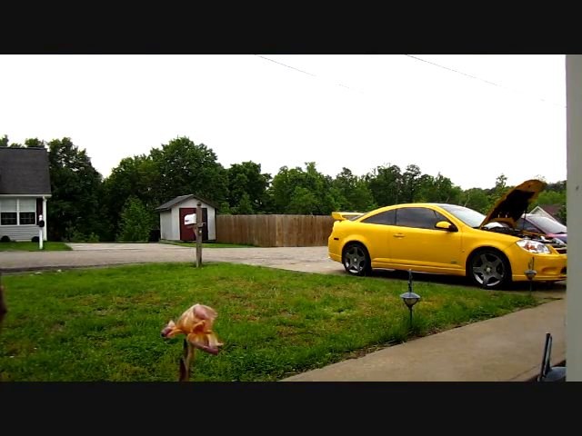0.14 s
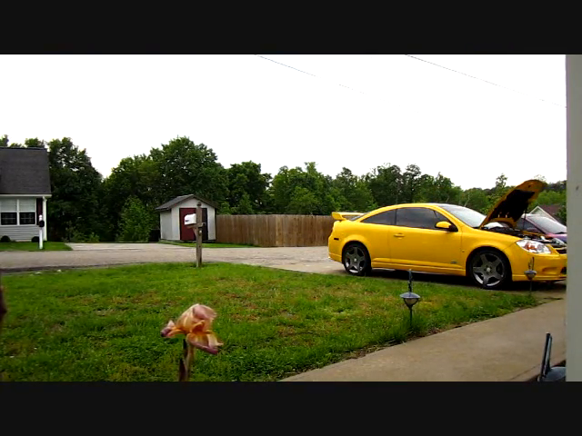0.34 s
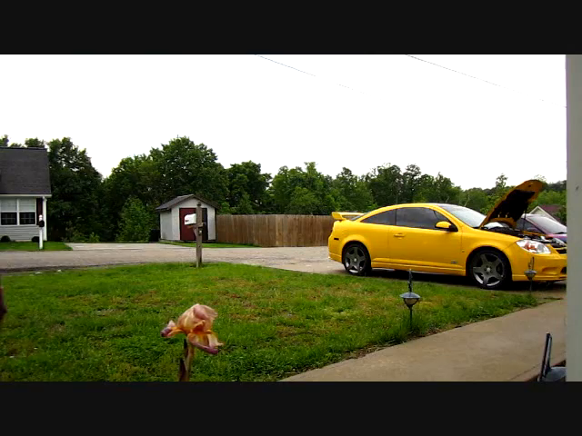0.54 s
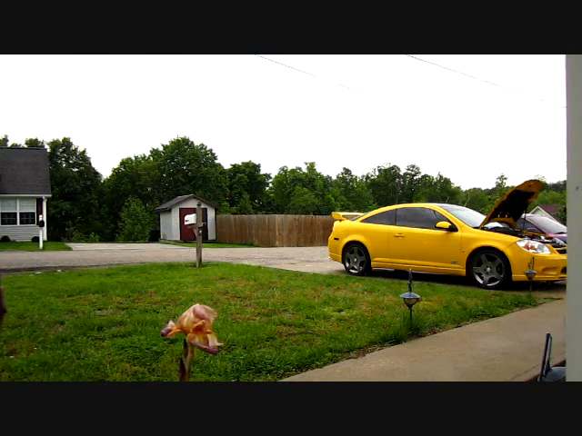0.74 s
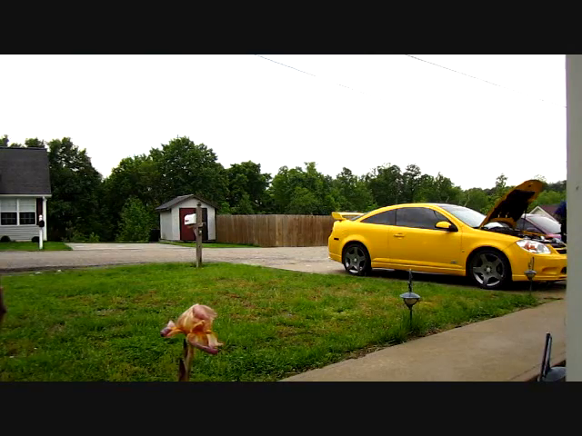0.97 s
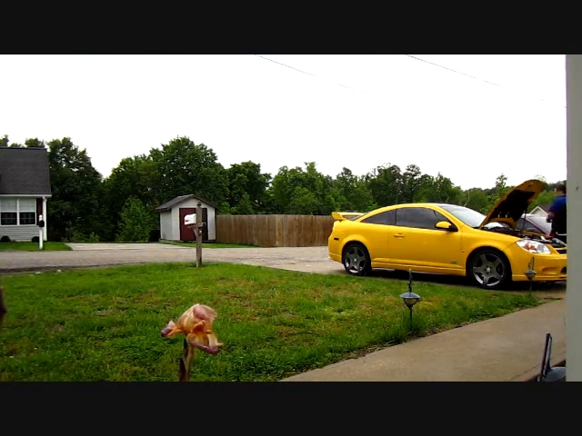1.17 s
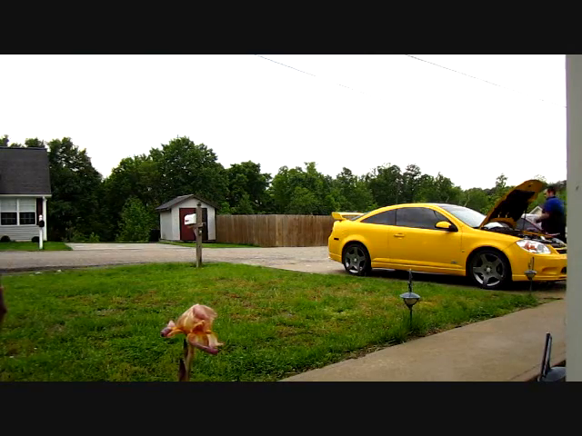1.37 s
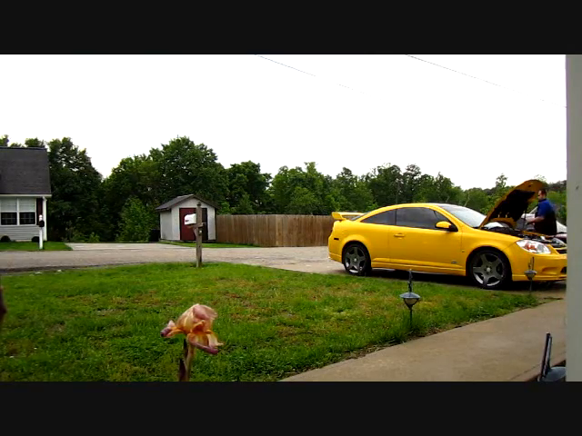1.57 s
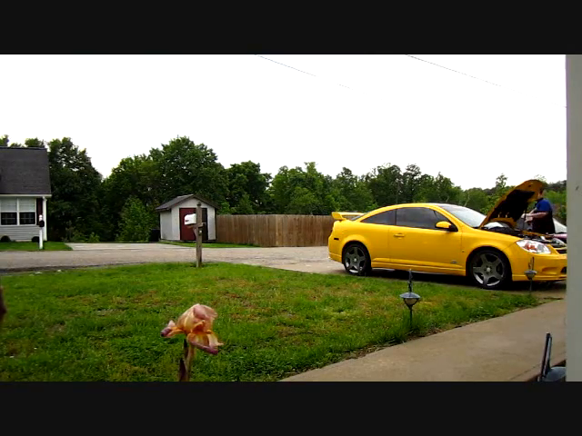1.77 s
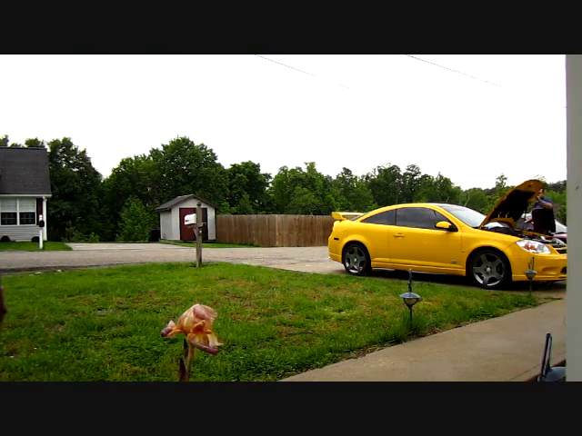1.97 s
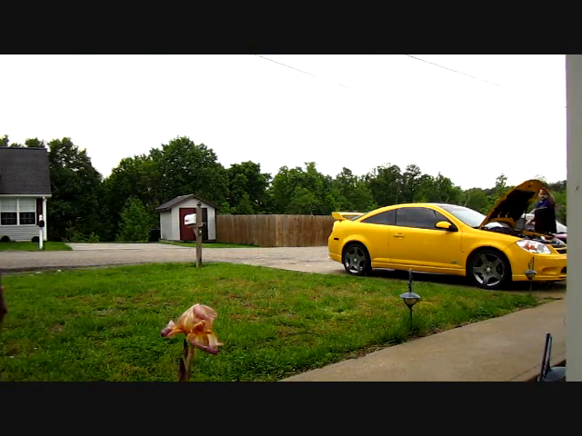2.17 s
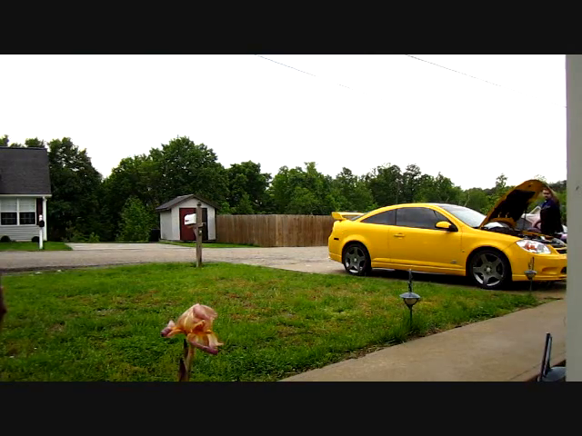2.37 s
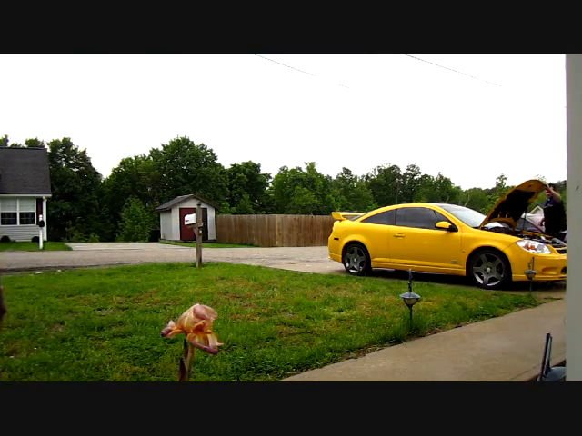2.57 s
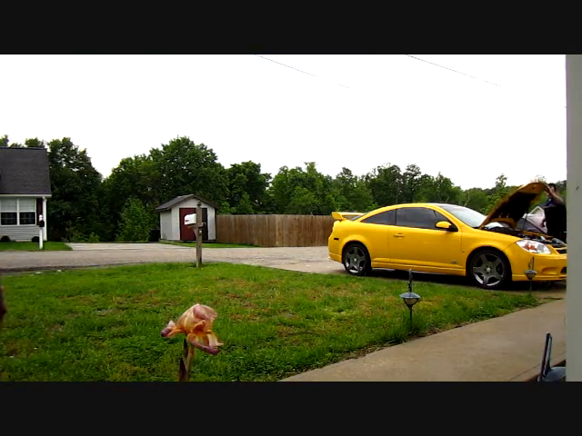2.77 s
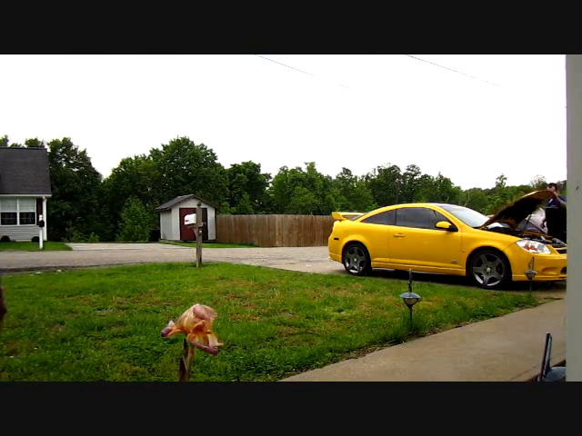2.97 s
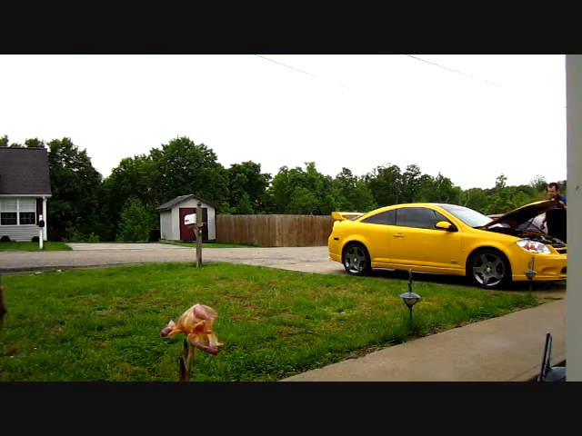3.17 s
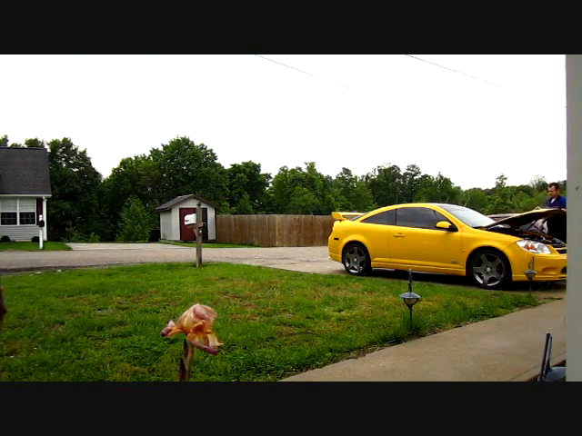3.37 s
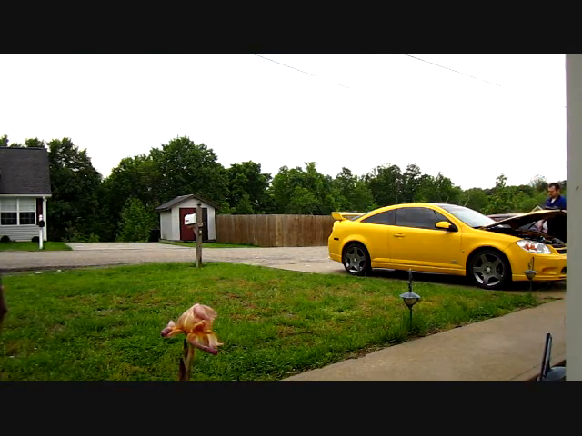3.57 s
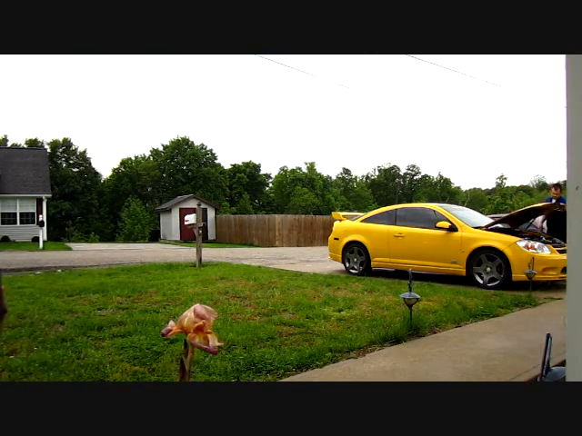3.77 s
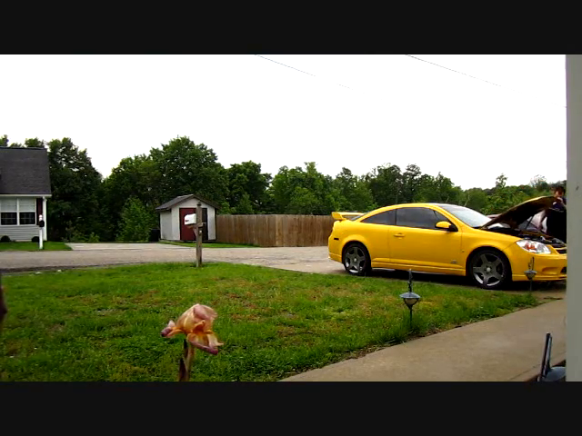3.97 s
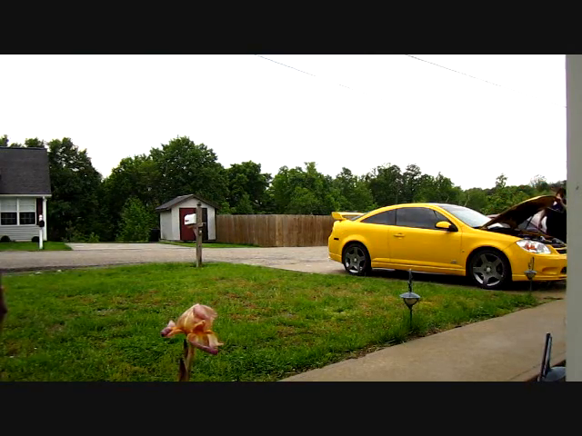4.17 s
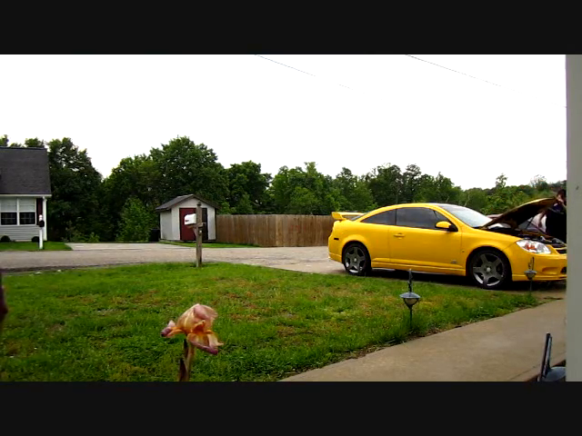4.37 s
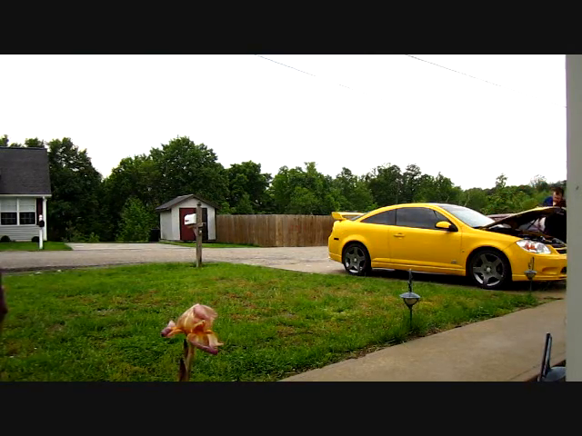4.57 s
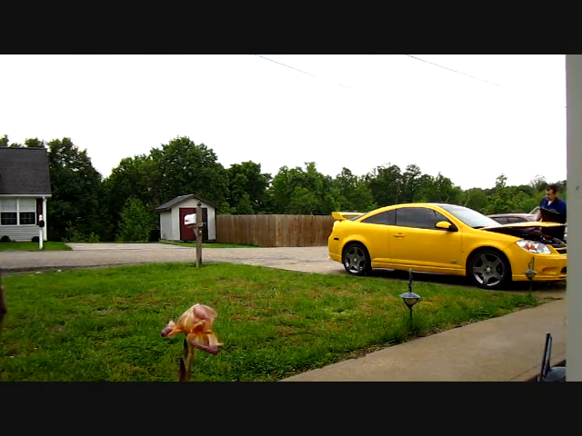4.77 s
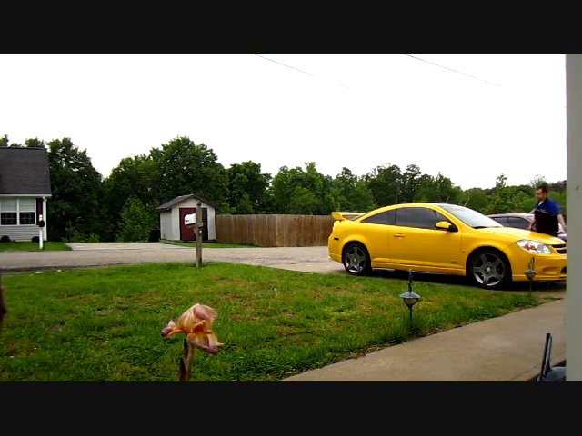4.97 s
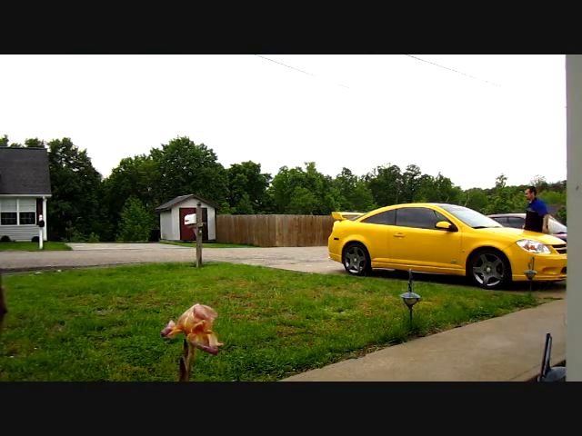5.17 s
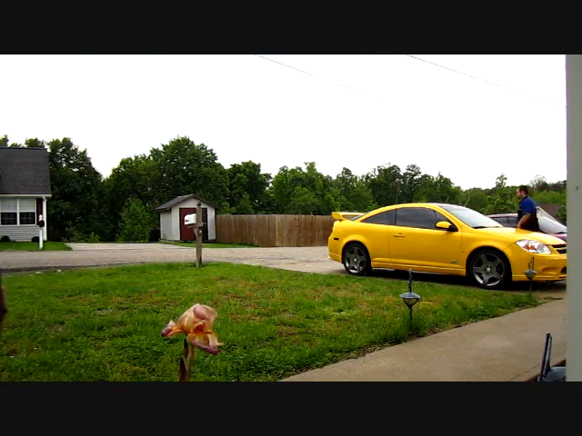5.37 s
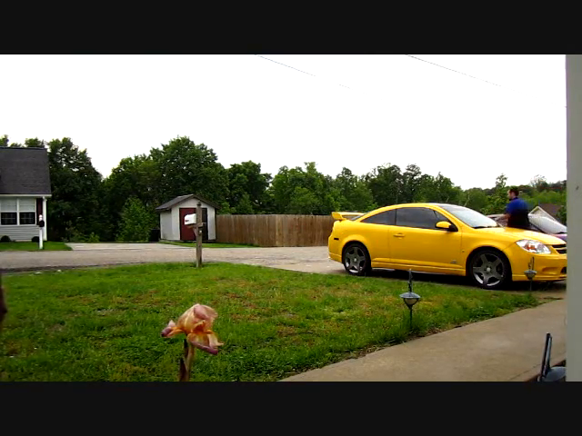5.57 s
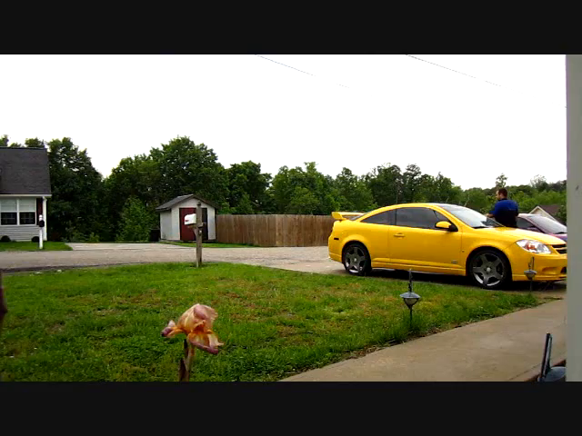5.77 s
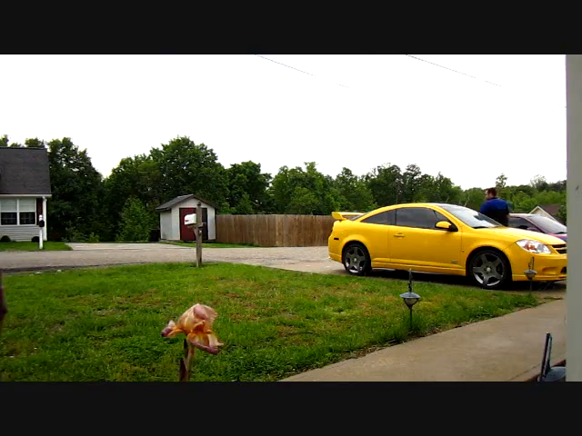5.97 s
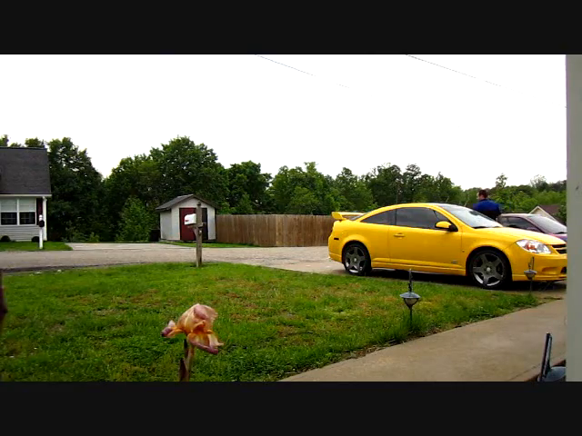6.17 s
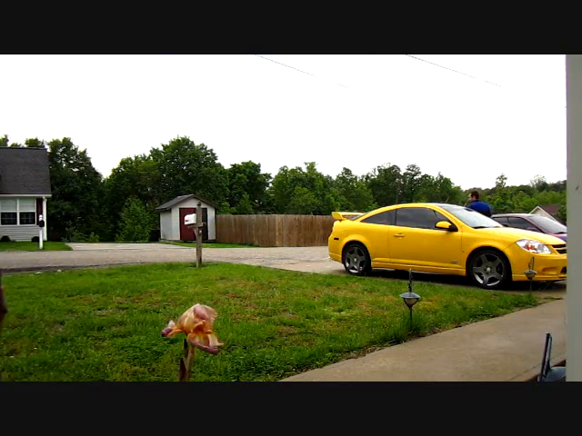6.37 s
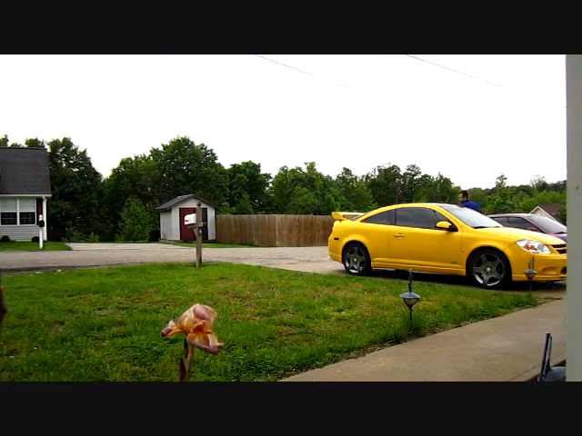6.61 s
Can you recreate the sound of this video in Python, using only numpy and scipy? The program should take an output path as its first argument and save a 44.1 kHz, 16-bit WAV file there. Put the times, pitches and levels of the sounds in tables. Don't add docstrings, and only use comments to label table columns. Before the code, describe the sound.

A breezy outdoor hush with slight hiss and a faint low traffic drone runs throughout. In the first second, distant birds give falling whistles and chirps while soft knocks and gritty scuffs begin. From 1 to 4 seconds, irregular muted taps, shoe scrapes and cloth-like brushes continue, with somewhat firmer knocks near 1.8, 2.3 and 3.15 seconds. Far chirps return between 2.6 and 4.7 seconds. A dry grit crack snaps at about 4.47. At 5.02 the car hood slams some metres away: tightly clustered latch clicks and hollow sheet-metal impacts form one very loud bang, with a low air thump and rattle fading over a few tenths of a second. House walls return short, dull echoes. The background ducks after the bang, then creeps back by about 6 seconds. Quiet scuffs, low brushes, sparse knocks and a thin bird note finish by 6.6 seconds.

```python
import sys
import numpy as np
from scipy import signal
from scipy.fft import rfft, irfft
from scipy.io import wavfile

SR = 44100
rng = np.random.default_rng(int(sys.argv[2]) if len(sys.argv) > 2 else 0)


def ratio_of_db(decibels):
    return 10 ** (np.asarray(decibels, float) / 20)


def wav_record(signal):
    frames = np.transpose(np.atleast_2d(signal))
    bounded = np.clip(frames, -1, 1)
    quanta = np.round(bounded * 32767).astype(np.int16)
    wavfile.write(sys.argv[1], SR, quanta)


N = 292812

# start_s, crack_db, crack_hz, blow_db, blow_hz (crack: latch, blow: panel)
CONTACTS = [(5.021, -28, 4000, -44, 1500), (5.0225, -19, 7650, -23.5, 2010),
            (5.0241, -22.5, 7500, -29, 1900), (5.027, -33, 2980, -20.5, 276), (5.031, -33, 8700, -15, 493),
            (5.041, -28.5, 2610, -20.5, 201), (5.049, -26, 4600, -14, 810), (5.058, -25, 9450, -12, 705),
            (5.064, -31, 4560, -14, 196), (5.066, -40, 5000, -14.5, 420), (5.072, -26, 6000, -11.5, 285),
            (5.0808, -31, 12000, -19, 410), (5.0855, -40, 9000, -15.5, 544), (5.109, -43, 4000, -16, 528)]


def at_hz(points, hz):
    table = np.array(points)
    return np.interp(np.log(hz), np.log(table[:, 0]), table[:, 1])


def rms_one(x):
    return x / np.sqrt(np.mean(x ** 2) + 1e-20)


def ring(clicks, hz, t60_s):
    r = ratio_of_db(-60 / (t60_s * SR))
    w = 2 * np.pi * hz / SR
    return signal.lfilter([0, np.sin(w)], [1, -2 * r * np.cos(w), r * r], clicks + 1e-18)


def soften(x, hz):
    r = np.exp(-2 * np.pi * hz / SR)
    return signal.lfilter([(1 - r) ** 2], [1, -2 * r, r * r], x)


def drift(rate_hz):
    settled = soften(rng.standard_normal(N + SR), rate_hz)[SR:]
    return rms_one(settled)


def noise_bands(length):
    settle = 8192
    white = rng.standard_normal((2, length + settle))
    edges_hz = 20 * 2 ** (np.arange(30) / 3)
    for k, (low_hz, high_hz) in enumerate(zip(edges_hz, edges_hz[1:])):
        sos = signal.butter(2, [low_hz, high_hz], "band", fs=SR, output="sos")
        yield np.sqrt(low_hz * high_hz), signal.sosfilt(sos, white[k % 2])[settle:]


def bell_db(hz, centre_hz, octaves):
    return -6 * (np.log2(hz / centre_hz) / octaves) ** 2


def add(out, start_s, x):
    at = round(start_s * SR)
    out[at:at + len(x)] += x[:len(out) - at]


def hush():
    # freq_hz, level_db (per Hz)
    spectrum = [(12, -34), (20, -5), (81, -1), (718, -8), (1120, -9), (1530, -12), (2530, -13.5),
                (7110, -23), (14300, -30), (16000, -62)]
    # time_s, level_db
    breeze = [(0, 1.5), (.3, 0), (1.1, 0.66), (1.4, 0), (1.85, 0.5), (2.3, -0.1), (3.2, 0.44), (3.8, -0.35),
              (4.75, 0.2), (5.9, 0.1), (6.64, -1.2)]
    swell_db = np.interp(np.arange(N) / SR, *np.transpose(breeze))
    flicker = [drift(10.0) for _ in range(4)]
    out = np.zeros(N)
    for k, (hz, band) in enumerate(noise_bands(N)):
        flicker_db = 1.21 * flicker[k // 2 % 4]
        out += band * ratio_of_db(at_hz(spectrum, hz) + swell_db + flicker_db)
    return ratio_of_db(-48) * rms_one(out)


def traffic():
    drone = ring(rng.standard_normal(N), hz=65.5, t60_s=0.082)
    return ratio_of_db(-59.5) * rms_one(drone)


def bird_notes():
    song_starts = [.085, .63]
    # offset_s, pitch_hz, level_db (rms)
    phrase = [(0, 2100, -59.5), (.072, 1920, -63), (.18, 1730, -66.5)]
    # start_s, start_hz, level_db (rms), length_s
    chirps = [(.0, 4040, -65, 0.046), (0.314, 3200, -64, .12), (.5, 4080, -66, .06),
              (.564, 2500, -61.5, 0.075), (2.692, 2330, -64, .045), (2.747, 2460, -60, 0.08),
              (2.93, 2400, -67, 0.049), (3.243, 2610, -61, 0.14), (3.841, 2534, -57, .036),
              (3.948, 2685, -57, .039), (4.28, 2536, -61, 0.12), (4.44, 3850, -66, .025),
              (4.447, 2540, -58, 0.036), (4.672, 4250, -64, 0.055)]
    # start_s, pitch_hz, level_db (rms), length_s
    peeps = [(.24, 13750, -73, .06), (1.60, 14500, -71, .05), (1.998, 4700, -71, .12),
             (2.60, 2800, -60, .045), (2.648, 2800, -65, .045), (3.72, 3250, -67, 0.29),
             (3.998, 4920, -70, 0.063), (4.03, 3300, -66, .06)]
    seep_starts = [0.55, 3.02, 5.46]
    seep_hz, seep_s = 7000, 0.24
    song = [(start + s, hz, level_db, 0.08) for start in song_starts for s, hz, level_db in phrase]
    held = [(s, seep_hz, -74, seep_s) for s in seep_starts]
    ends = [(s + seep_s, 0.985 * seep_hz, -72, 0.1) for s in seep_starts[1:]]
    falling = [(*note, 1800) for note in [*song, *ends, *chirps]]
    level = [(*note, 0) for note in [*held, *peeps]]
    return falling + level


def whistles():
    out = np.zeros(N)
    waver_hz = 39.0 * drift(33.5)
    for start_s, start_hz, level_db, length_s, fall_hz_per_s in bird_notes():
        count, at = round(length_s * SR), round(start_s * SR)
        glide_hz = np.linspace(start_hz, start_hz - fall_hz_per_s * length_s, count)
        phase = 2 * np.pi * np.cumsum(glide_hz + waver_hz[at:at + count]) / SR
        add(out, start_s, ratio_of_db(level_db + 4.5) * np.sin(phase) * np.hanning(count) ** 0.16)
    scatter = rng.standard_normal(4000) * np.exp(-np.arange(4000) / (0.028 * SR))
    scattered = signal.fftconvolve(out, scatter / np.linalg.norm(scatter))[:N]
    fading_db = 2.5 * drift(43) - 1.5
    return out * ratio_of_db(fading_db) + 0.9 * scattered


def knocks():
    # start_s, peak_db, pitch_hz
    taps = [(0.119, -42, 414), (0.39, -48, 388), (0.525, -41, 288), (0.619, -40.5, 997), (0.789, -45, 316),
            (1.08, -40.5, 294), (1.156, -38.5, 393), (1.489, -40.5, 856), (1.669, -36.5, 1046),
            (1.801, -33.5, 556), (1.813, -32, 743), (2.117, -43, 1060), (2.283, -31, 313),
            (2.291, -39, 404), (2.489, -35, 928), (2.733, -42, 246), (2.757, -39.5, 288), (3.144, -32, 657),
            (3.152, -33, 630), (3.657, -42, 796), (3.995, -39.5, 1144), (4.084, -39.5, 440),
            (4.299, -43.5, 668), (4.589, -55, 650), (4.812, -37, 1105), (4.902, -41.5, 395),
            (5.604, -40.5, 554), (5.962, -40, 1035), (6.382, -43.5, 240)]
    out = np.zeros(N)
    pushes = rng.standard_normal((len(taps), 600))
    tap = np.r_[np.hanning(24), np.zeros(SR // 4)]
    for (start_s, peak_db, hz), push in zip(taps, pushes):
        t60_s = min(0.16, 94 / hz)
        rough = push * np.exp(-np.arange(len(push)) / (0.004 * SR))
        grit = np.r_[rough, np.zeros(len(tap) - len(push))]
        body = ring(tap + 0.48 * grit, hz, t60_s)
        body += 0.38 * ring(grit, 0.82 * hz, 0.34 * t60_s)
        body += 0.97 * ring(grit, 1.152 * hz, 0.5 * t60_s)
        body += 0.6 * ring(grit, 1.74 * hz, 0.42 * t60_s)
        add(out, start_s, ratio_of_db(peak_db) * body / np.abs(body).max())
    return out


def scuffs():
    # start_s, centre_hz, level_db (rms)
    quick = [(0.438, 5500, -56), (0.528, 6260, -50.5), (0.865, 4000, -54), (1.012, 6700, -53),
             (1.30, 13000, -66), (1.382, 8900, -49), (1.55, 6000, -58), (1.70, 4000, -55),
             (1.92, 1800, -51), (2.27, 9000, -63), (2.488, 3000, -54.5), (2.839, 7000, -57),
             (3.057, 4800, -51.5), (3.09, 11500, -60), (3.346, 3000, -57), (3.503, 2500, -53),
             (3.654, 3000, -54), (3.849, 2800, -50), (3.948, 2880, -47.5), (4.291, 2580, -47.5),
             (4.471, 4000, -57), (4.543, 6000, -64), (4.597, 3970, -51.5), (4.712, 3000, -52),
             (5.555, 8400, -60), (5.694, 7000, -57), (5.827, 8000, -59), (5.959, 4200, -47.5),
             (6.022, 4000, -53.5)]
    # start_s, centre_hz, level_db (rms), length_s
    longer = [(0.586, 2920, -50, .046), (1.022, 1760, -48.5, 0.046), (1.1, 7300, -54.5, 0.059),
              (1.486, 3000, -54, .046), (1.797, 5400, -48, .066), (1.812, 1900, -46, 0.053),
              (1.913, 7400, -54.5, 0.04), (2.03, 2500, -56, .11), (2.746, 7800, -52.5, .07),
              (3.143, 1510, -48, 0.034), (3.797, 7200, -60, 0.13), (3.882, 11000, -62, .17),
              (4.097, 2490, -55, .098), (4.795, 1500, -55, 0.048), (5.43, 420, -52, .17),
              (5.66, 520, -55, .13), (5.878, 2200, -54, 0.043), (5.941, 695, -51, .13),
              (6.385, 477, -49.5, 0.092), (6.438, 7500, -61, .05)]
    # start_s, level_db, pitch_hz
    ticks = [
        (4.4708, -28, 4800),
        (4.5435, -39, 7500),
        (4.640, -41, 7500),
    ]
    out, size = np.zeros(N), 8192
    rubs = [(*row, 0.026) for row in quick] + [*longer]
    shape = (len(rubs), size)
    grit = rng.standard_normal(shape) * ratio_of_db(6.9 * rng.standard_normal(shape))
    hz = np.maximum(np.fft.rfftfreq(size, 1 / SR), 1)
    t = np.arange(size) / SR
    for (start_s, centre_hz, level_db, length_s), grains in zip(rubs, grit):
        octaves = 1.23 / (1 + centre_hz / 9000)
        tone = rms_one(irfft(rfft(grains) * ratio_of_db(bell_db(hz, centre_hz, octaves))))
        stroke = (1 - np.exp(-t / (0.04 * length_s))) * np.exp(-(t / length_s) ** 2)
        add(out, start_s, ratio_of_db(level_db) * tone * stroke)
    click = np.r_[1., np.zeros(400)]
    for start_s, level_db, tick_hz in ticks:
        add(out, start_s, -ratio_of_db(level_db) * ring(click, tick_hz, t60_s=0.001))
    return out


def strike(modes, at, blow_db, centre_hz, octaves, damping):
    out = np.zeros(SR)
    signs = rng.choice([-1, 1], (len(at), len(modes)))
    for k, (hz, level_db, t60_s) in enumerate(modes):
        clicks = np.zeros(SR)
        click_db = blow_db + 0.5 * level_db + bell_db(hz, centre_hz, octaves)
        clicks[at] = ratio_of_db(click_db) * signs[:, k]
        out += ring(soften(clicks, 1.73 * hz), hz, damping * t60_s)
    return out


def hood():
    # freq_hz, level_db, t60_s
    panel = [(120, -22, .2), (192.7, 3.5, 0.39), (279.8, -3, 0.32), (328, -8, 0.34), (392, -3, 0.24),
             (413, -5, 0.33), (504.4, 9, 0.17), (554, -3, 0.24), (602, -15, 0.27), (679, 0, 0.18),
             (724, -20, 0.2), (810, -15, 0.13), (838, -5.5, 0.18), (972, -11, 0.2), (1060, -16, .18),
             (1260, -14, .2), (1330, -12, .2), (1500, -22, .2), (1800, -8, .2), (1900, -3, 0.21),
             (2040, -20, 0.16), (2322, -1, .16), (2600, -18, 0.23), (2900, -9, .13)]
    # freq_hz, level_db, t60_s
    latch = [(6280, -10, .12), (6681, -5, 0.14), (7530, -8, 0.08), (8750, -14, .11), (8879, -11, 0.093),
             (11300, -7, 0.11), (12000, 2, .14)]
    # freq_hz, level_db (per Hz)
    rattle = [(80, -26), (130, -12.5), (250, -9), (600, -8), (1000, -14.5), (1900, -17.5), (2840, -21.5),
              (7000, -28.5), (11500, -33), (16000, -44)]
    # freq_hz, t60_s
    rattle_t60 = [(30, 0.96), (150, 0.61), (500, 0.36), (1500, 0.24), (5000, 0.19), (15000, 0.23)]
    start_s, crack_db, crack_hz, blow_db, blow_hz = np.transpose(CONTACTS)
    delay_s = start_s - start_s[0]
    at = np.round(delay_s * SR).astype(int)
    out = strike(panel, at, blow_db + 3.5, blow_hz, octaves=0.26, damping=0.71)
    out += strike(latch, at, crack_db, crack_hz, octaves=0.42, damping=0.62)
    since_s = np.maximum(np.arange(SR) / SR - delay_s[:, None], 0)
    for hz, band in noise_bands(SR):
        rise = 1 - np.exp(-since_s / (0.00044 + 5.8 / hz))
        colour_db = np.maximum(bell_db(hz, crack_hz, 0.34), -9.0)
        level_db = crack_db + 37.0 + at_hz(rattle, hz) + colour_db
        decay_db = -60 * since_s / at_hz(rattle_t60, hz)
        power = ratio_of_db(level_db[:, None] + decay_db) ** 2 * rise ** 2
        out += band * np.sqrt(power.sum(axis=0))
    return out


def street(x):
    # delay_s, level_db, low_cut_hz, high_cut_hz
    echoes = [(.105, -21.5, 140, 1000), (0.2, -27.5, 1800, 7000), (0.16, -24, 68, 240),
              (0.25, -35, 180, 310)]
    out = x.copy()
    for delay_s, level_db, low_hz, high_hz in echoes:
        smear = rng.standard_normal(2500) * np.exp(-np.arange(2500) / (0.0074 * SR))
        dull = soften(x - soften(x, low_hz), high_hz)
        echo = signal.fftconvolve(dull, smear / np.linalg.norm(smear))
        add(out, delay_s, ratio_of_db(level_db) * echo)
    return out


def snap():
    out = np.zeros(N)
    click, pulse_hz = np.r_[1., np.zeros(2000)], 1200
    pulse = ring(click, pulse_hz, t60_s=0.0044) + ring(click, 0.4 * pulse_hz, t60_s=0.009)
    add(out, 5.033, -ratio_of_db(-8) * pulse)
    return out


def cavity():
    # start_s, pitch_hz, level_db, t60_s
    thumps = [(5.048, 51.7, -40, 0.14), (5.095, 45.4, -44, 0.14), (5.135, 46, -47, .15),
              (5.215, 60, -53, 0.12), (5.251, 90, -52.5, 0.073)]
    out = np.zeros(N)
    for start_s, hz, level_db, t60_s in thumps:
        click = np.zeros(SR)
        click[0] = ratio_of_db(level_db + 27.5)
        add(out, start_s, ring(soften(click, hz), hz, t60_s))
    return out


def scene():
    slam = snap()
    add(slam, CONTACTS[0][0], street(hood()))
    around = hush() + traffic() + whistles() + knocks() + scuffs()
    return (slam + cavity() + around)[None]


def band_limit(x):
    return signal.sosfilt(signal.butter(12, 16440, fs=SR, output="sos"), x)


def record(dry):
    duck_db, duck_s, attack_s, recover_s = -5.5, 5.06, 0.1, 0.42
    since_s = np.maximum(np.arange(N) / SR - duck_s, 0)
    gain_db = duck_db * (1 - np.exp(-since_s / attack_s)) * np.exp(-(since_s / recover_s) ** 2 / 2)
    bass_cut = dry - soften(dry, 4.5)
    levelled = np.clip(bass_cut * ratio_of_db(gain_db), -1, 1)
    top_cut = signal.ellip(10, 0.5, 70, 15800, fs=SR, output="sos")
    return band_limit(signal.sosfilt(top_cut, levelled))


dry = scene()
out = record(dry)
wav_record(out)
```